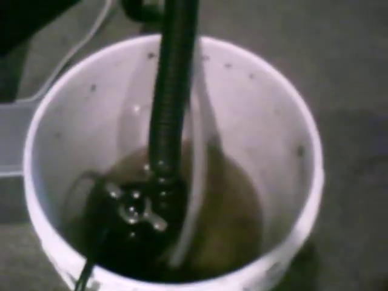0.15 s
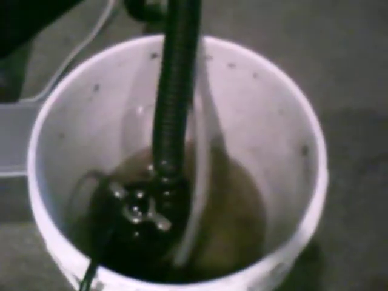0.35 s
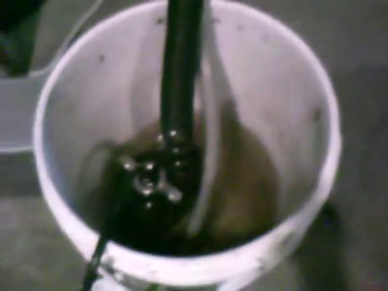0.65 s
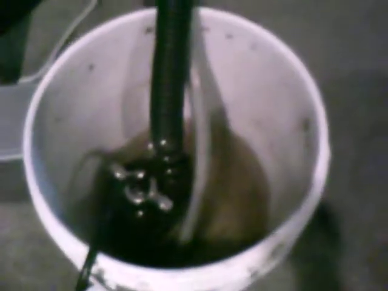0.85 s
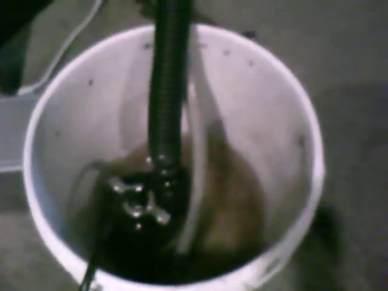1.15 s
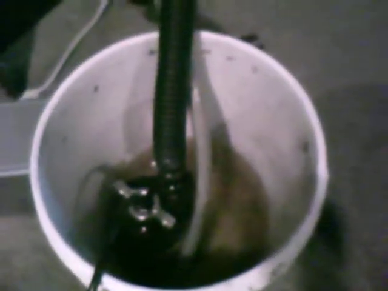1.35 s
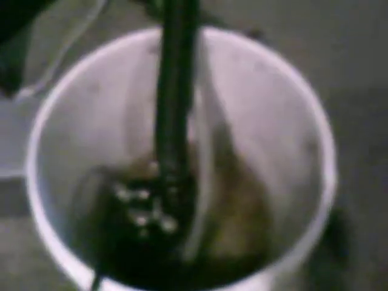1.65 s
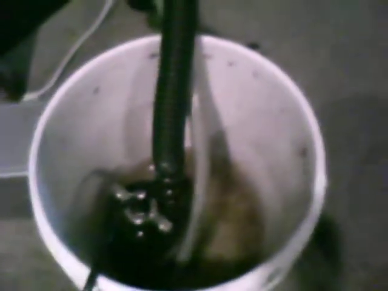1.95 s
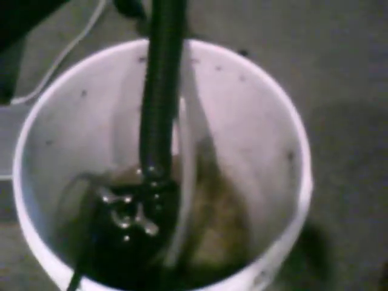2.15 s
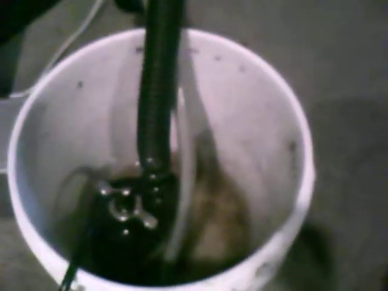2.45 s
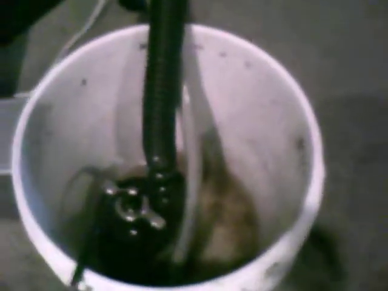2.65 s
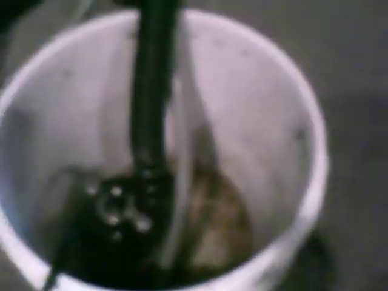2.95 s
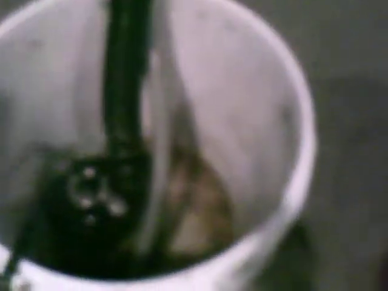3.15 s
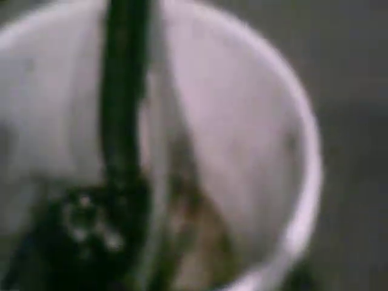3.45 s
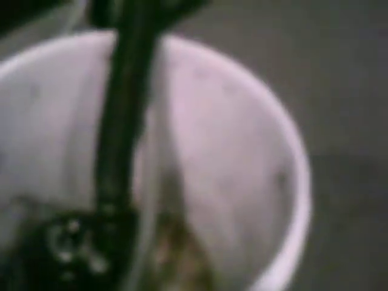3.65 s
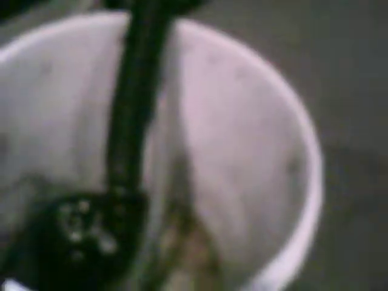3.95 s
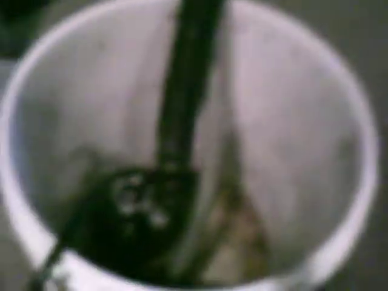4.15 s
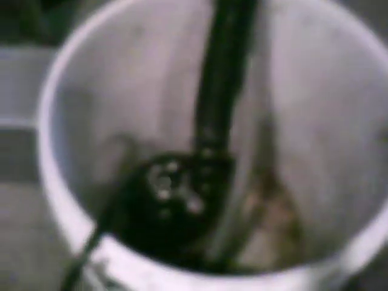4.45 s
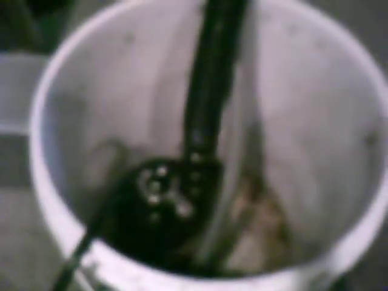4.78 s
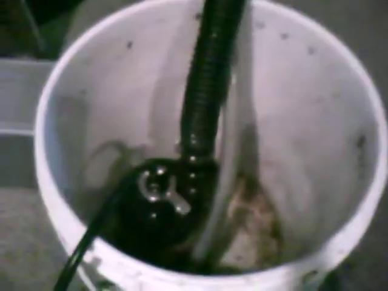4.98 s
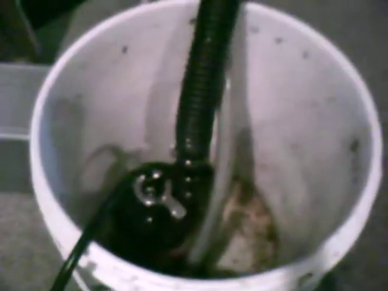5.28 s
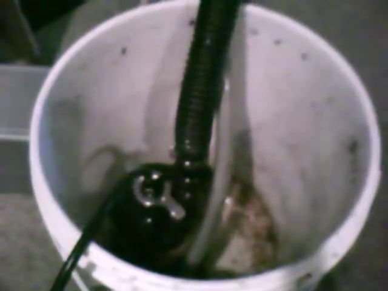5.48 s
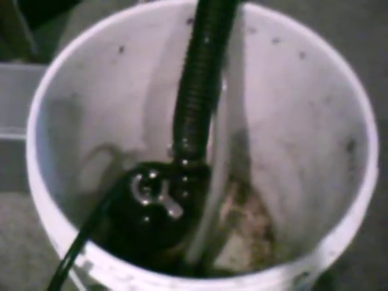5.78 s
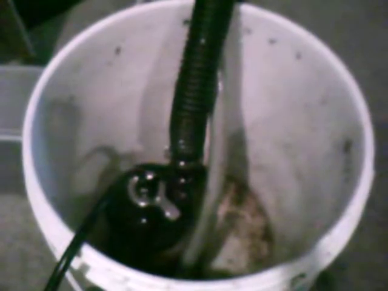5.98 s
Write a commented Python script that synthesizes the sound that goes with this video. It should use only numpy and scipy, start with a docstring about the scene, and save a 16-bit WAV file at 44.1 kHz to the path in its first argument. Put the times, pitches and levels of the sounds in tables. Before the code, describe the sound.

A bucket pump's low electric hum slowly grows beneath a constant room drone and muted rush. Then the intake breaks the surface, spitting and slapping water in rapid irregular bursts, gurgling and ringing in housing and hose. A smooth low moan takes over briefly, the noise calms, and finally raspy air and a brighter buzzing whirr come back. Near microphone, mono, muffled top end.

```python
"""A room where other machinery drones, and a small mains pump empties a bucket.
Steady sines make the drones and filtered noise makes the rush. The pump's hum grows as the water sinks.
Then it gulps air: slugs of water slap in the housing (short bursts of noise), the four vanes sing (sines
that bend in pitch), and air rasps through housing and hose (noise through ringing filters)."""
import sys
import numpy as np
from scipy import signal
from scipy.fft import rfft, irfft, next_fast_len
from scipy.io import wavfile
from scipy.ndimage import uniform_filter1d, map_coordinates

SR = 44100
rng = np.random.default_rng(int(sys.argv[2]) if len(sys.argv) > 2 else 0)


def generate_wav(signal):
    """Clip the signal to [-1, 1] and save it as 16-bit WAV at the path in sys.argv[1]."""
    frames = np.transpose(np.atleast_2d(signal))
    scaled = np.clip(frames, -1, 1) * 32767
    pcm = np.round(scaled).astype(np.int16)
    wavfile.write(sys.argv[1], SR, pcm)


N = 269892
T = np.arange(N) / SR  # time of each sample, s

# In colour and ringing tables, levels only count relative to each other.
# Colour of the steady rush of pump and room: pitch_hz, level_db
RUSH_COLOUR = [(12, -47), (20, -7), (162, -3.5), (219, -6), (288, -4.5), (541, -11.5), (714, -8.5),
               (942, -12), (1210, -15), (1600, -8.5), (2160, -27), (3400, -29.5), (4960, -46),
               (6070, -45.5), (8210, -50), (10700, -93.5), (18100, -120)]
# Broad rises in the rush: pitch_hz, width_hz, lift_db
RUSH_PEAKS = [(228, 20, -1.5), (1159, 47, 8), (1770, 580, 4.5)]
# Tones of a steady motor shaft: multiple of the shaft rate, level_db
SHAFT_TONES = [(.5, -57.5), (1, -54.5), (3, -63), (18, -59), (19, -63), (20, -59.5), (21, -54.5),
               (22, -58.5), (23, -68.5), (24, -59.5), (25, -59.5), (49, -71.5)]
# A second drone, its balance drifting: time_s, first_db, second_db, third_db, sixth_and_eighth_db
DRONE_LEVELS = [(0, -50, -52.5, -76, -58.5), (.8, -47, -48, -66, -55), (1.5, -49, -58.5, -60.5, -65.5),
                (3.2, -44.5, -60.5, -51, -61), (6.12, -53.5, -60, -63.5, -70.5)]
# Faint ticks: start_s, level_db
FAINT_TICKS = [(0.5222, -58), (0.5337, -57), (2.6794, -57), (2.6944, -57), (2.7194, -67)]
# Magnetic hum of the pump; it grows as the water sinks, more once air gets in:
# time_s, first_db, second_db, third_db, fifth_db, sixth_db
HUM_LEVELS = [(0, -54, -60, -54, -76, -64.5), (1.2, -61.5, -48, -56.5, -61, -48),
              (2.3, -55, -44.5, -58, -56.5, -49), (3.2, -52.5, -40.5, -55.5, -49.5, -48.5),
              (3.8, -47.5, -49, -63, -36, -42), (4.3, -42, -47, -61.5, -46.5, -47),
              (4.8, -40, -46, -57, -40, -49.5), (5.5, -42, -46.5, -56.5, -38.5, -44.5),
              (6.12, -42, -51.5, -53.5, -43.5, -50)]
# Vanes passing, slower under load: time_s, pitch_hz, level_db
VANE_TONE = [(3.25, 237, -44), (3.55, 234, -47.5), (3.75, 226.9, -37), (3.9, 225.4, -23.5),
             (4.22, 226.7, -18.5), (4.32, 228.7, -23), (4.42, 231, -32.5), (4.72, 228, -41),
             (4.84, 234, -45), (5.1, 234.5, -45), (5.26, 234.6, -38), (5.58, 234.2, -28),
             (5.82, 233.7, -25.5), (6.07, 232.5, -25.5), (6.12, 233, -34)]
# Third harmonic of the vanes: time_s, level_db
VANE_THIRD = [(3.25, -70.5), (4.3, -49.5), (4.5, -61), (5.35, -47.5), (5.55, -30.5), (5.7, -28.5),
              (6.05, -38), (6.12, -53)]
# Vane harmonics that follow the third: multiple, level_db relative to the third
VANE_OVERTONES = [(4, -11.5), (5, -8.5), (6, -11)]
# The vanes bite a slug of water: middle_s, level_db
VANE_SURGES = [(3.374, -26.5), (3.441, -29.5), (3.54, -30), (3.61, -24.5), (3.689, -24), (3.785, -19.5),
               (3.87, -24.5), (4.521, -31.5), (4.62, -29), (4.69, -36), (4.84, -47)]
# What passes the pump once it gulps: time_s, water_db, air_db, hose_ring_db, housing_ring_db, spray_db
PUMP_FLOW = [(3.27, -36.5, -40, -31, -27, -44), (3.36, -34.5, -37.5, -35.5, -31.5, -44.5),
             (3.55, -35.5, -34.5, -32.5, -38.5, -43.5), (3.8, -32, -35, -33, -38.5, -43),
             (4.1, -34, -36, -35, -41.5, -43.5), (4.29, -39, -39.5, -36.5, -52, -46),
             (4.4, -46, -39.5, -36, -53, -46), (4.5, -42.5, -41, -30, -56, -45.5),
             (4.68, -49, -43, -31.5, -40, -49), (4.78, -58, -48.5, -39.5, -40.5, -52),
             (5.1, -59, -51.5, -47, -40.5, -54), (5.35, -49, -40.5, -42.5, -42.5, -49),
             (5.48, -53.5, -43, -45.5, -38, -47), (5.525, -52.5, -33, -40.5, -28, -43.5),
             (5.77, -53.5, -28, -34, -27.5, -42.5), (5.95, -48.5, -27, -41, -30, -42),
             (6.04, -49, -29, -33, -24.5, -42.5), (6.12, -56, -38, -49, -46, -45)]
# Water sloshing: pitch_hz, width_hz, level_db
GURGLE_RINGS = [(137, 120, -1.5), (250.5, 141, 2.5), (404, 140, 0), (558, 166, -3)]
# Bucket rings, before the filter is applied twice: pitch_hz, width_hz, level_db
BUCKET_RINGS = [(617.7, 27.5, -1), (738, 35.3, 0)]
# Hose rings: pitch_hz, width_hz, level_db
HOSE_RINGS = [(903, 52, 0.5), (951.5, 60, 4), (980, 115, -1)]
# Housing rings, before the filter is applied twice: pitch_hz, width_hz, level_db
HOUSING_RINGS = [(1321, 32, -3), (1401.4, 47, 1)]
# Outlet rings, heard with the water and with the housing ring, before the filter is applied twice:
# pitch_hz, width_hz, level_db
OUTLET_RINGS = [(1153, 82, -0.5), (1197, 93, -3)]
# Air through the intake: pitch_hz, width_hz, level_db
RASP_RINGS = [(1157, 200, -5), (1332, 340, 1.5), (1532, 71, 4.5), (1674, 97, 2.5), (2037, 140, -21.5)]
# Colour of the spray: pitch_hz, level_db
SPRAY_COLOUR = [(1120, -22.5), (1900, 2.5), (2260, -6.5), (2520, -5), (2740, -9.5), (3580, -6.5),
                (3950, -20.5), (4320, -22), (4890, -33), (6200, -52.5), (8060, -83.5), (13600, -120)]
# Rises in the spray: pitch_hz, width_hz, lift_db
SPRAY_RISES = [(2935, 68, 3.5), (3080, 90, 4), (3455, 240, 2), (4270, 390, 8.5)]
# Colour of the hiss: pitch_hz, level_db
HISS_COLOUR = [(4300, -64), (4800, -11.5), (5400, -11.5), (6000, -18.5), (6400, -15.5), (6900, -6),
               (7280, -4), (7700, -10.5), (8300, -17.5)]
# The loudest slugs of water: start_s, spray_db, rasp_db, hiss_db
LOUD_SLAPS = [(3.2892, -23, -23, -53), (3.2992, -34.5, -12.5, -53), (3.321, -17, -27, -52),
              (3.3315, -26.5, -20, -57), (3.3813, -42, -11.5, -60), (3.4213, -18, -19, -51),
              (3.4337, -19.5, -26, -64), (3.4497, -30, -36, -60), (3.4624, -23.5, -26, -63),
              (3.479, -17, -10.5, -60), (3.508, -26, -13.5, -60), (3.533, -27, -28, -59),
              (3.545, -30.5, -28, -54.5), (3.5917, -21, -8.5, -49.5), (3.6231, -24, -24, -68),
              (3.646, -22.5, -16, -67), (3.6897, -22.5, -22, -71), (3.7154, -27.5, -34, -66),
              (3.728, -30, -21, -65.5), (3.7527, -24, -16.5, -61), (3.7759, -24.5, -11, -52),
              (3.8087, -26.5, -23, -65), (3.8463, -26.5, -27, -72), (3.8664, -20.5, -35, -63),
              (3.9044, -36.5, -31, -56), (3.9235, -42.5, -35, -60), (3.949, -35.5, -38, -61),
              (4, -32.5, -29, -65), (4.0308, -31, -34, -66.5), (4.0744, -41, -36, -55),
              (4.118, -44, -38, -50), (4.1904, -38, -42, -62), (4.2404, -40, -29, -60),
              (4.69, -36, -27, -69), (4.902, -50, -26, -57.5), (4.946, -48, -24.5, -62),
              (5.3986, -40, -19.5, -69.5), (5.5994, -39, -16, -75), (5.695, -29.5, -27, -64),
              (5.7514, -29.5, -26, -67), (5.801, -41.5, -18.5, -72), (5.968, -29.5, -19.5, -72),
              (6.01, -28, -27.5, -69)]
# Low jolts of pump and bucket: start_s, pitch_hz, level_db, fade_s (time to fade by 60 dB)
JOLTS = [(3.31, 61, -35, 0.76), (3.596, 260, -19, 0.17), (4.22, 58, -43, .6)]

SHAFT_HZ, DRONE_HZ, WHINE_HZ = 58.63, 212.3, 5906
HUM_HZ = 119.9  # twice the mains
RUSH_DB, WHINE_DB = -41, -82
SURGE_S = 0.019  # from a surge's middle to where it has sunk to about a third
GULP_S = 3.282  # the intake first breaks the surface
BUCKET_WATER_DB, BUCKET_AIR_DB = -3.5, -9.5  # how much of water and of air the bucket passes on
OUTLET_WATER_DB, OUTLET_RING_DB = -7, -3.5  # the outlet, over the water and over the housing ring
HISS_STEADY_DB, HISS_WATER_DB = -75, -40  # a steady part, and a part over the water level
SMALL_COUNT = 60  # small slugs at random moments
SMALL_DB = (2, 6.5, -27)  # their spray, rasp and hiss over the water level, before scatter
SMALL_SCATTER_DB = 4.5  # times the log of a random number from 0 to 1
RASP_FADE_S, SPRAY_FADE_S, HISS_FADE_S = 0.037, 0.032, 0.077  # time to fade by 60 dB
TOP_HZ = 8300


def amp(db):
    """Turn decibels into a plain gain."""
    return 10 ** (np.asarray(db) / 20)


def unit(x):
    """Scale to an rms of 1."""
    return x / np.sqrt(np.mean(x ** 2) + 1e-20)


def both(*db):
    """Gain of unrelated sounds together: their powers add."""
    return np.sqrt(sum(amp(2 * d) for d in db))


def curves(rows):
    """One value per sample for each column after the time."""
    s, *columns = np.transpose(rows)
    return [np.interp(T, s, column) for column in columns]


def wobble(rate):
    """A smooth random curve through a given number of random points a second."""
    points = rng.standard_normal(int(N * rate / SR) + 4)
    return map_coordinates(points, [T * rate])


def filtered(x, response):
    """Pass x through a filter, given as a gain for each frequency."""
    size = next_fast_len(N + 8192)
    spectrum = rfft(x, size) * response(np.fft.rfftfreq(size, 1 / SR))
    return irfft(spectrum, size)[:N]


def shape(points, peaks=()):
    """A filter drawn through points on a log pitch axis, lifted at the peaks."""
    f, level_db = np.transpose(points)

    def response(hz):
        base_db = np.interp(np.log(hz + 1), np.log(f + 1), level_db)
        lift_db = sum(db / (1 + (2 * (hz - c) / w) ** 2) for c, w, db in peaks)
        return amp(base_db + lift_db)
    return response


def modes(table, edge_hz=2300):
    """A filter that rings at several pitches; the ringing is dull: little of it sounds above the edge."""
    def response(f):
        ring = 0
        for k, (c, w, db) in enumerate(table):
            sign = (-1) ** k  # neighbours alternate
            ring = ring + sign * amp(db) * 1j * f * w / (c * c - f * f + 1j * f * w)
        return ring / (1 + (f / edge_hz) ** 5)
    return response


def twice(table):
    """The ringing filter applied twice: sharp rings, dark between."""
    once = modes(table)
    return lambda f: once(f) ** 2


def noise(response, gain=1, patchy_db=0):
    """Noise with short patches of random colour, under a gain, then filtered; rms 1 where the gain is 1."""
    z = signal.stft(rng.standard_normal(N), nperseg=256)[2]
    patches = uniform_filter1d(rng.standard_normal(z.shape), 4, 0)  # smooth over pitch
    patches = uniform_filter1d(patches, 6, 1)  # smooth over time
    source = signal.istft(z * amp(patchy_db * unit(patches)), nperseg=256)[1][:N]
    return filtered(source * gain, response) / np.std(filtered(source, response))


def tone(phase, db):
    """A sine of given rms level, phase in turns, from a random starting point."""
    return np.sqrt(2) * amp(db) * np.sin(2 * np.pi * (phase + rng.random()))


def bursts(times, db, fade_s, rise=0.0029):
    """A gain that swells quickly at each time and dies away; rise in seconds."""
    hits = np.zeros(N)
    hits[np.round(np.asarray(times) * SR).astype(int)] = amp(db)
    t = T[:SR // 2]
    swell = amp(-60 * t / fade_s) * (1 - np.exp(-t / rise))
    return signal.fftconvolve(hits, swell)[:N]


def machinery():
    """The rush throbs at the shaft rate and twice it; shaft tones, a drone, ticks and a thin whine lie on top."""
    throb = 1 + 0.15 * np.sin(2 * np.pi * SHAFT_HZ * T) + 0.14 * np.sin(4 * np.pi * SHAFT_HZ * T + 1)
    out = amp(RUSH_DB + 0.37 * wobble(3.8)) * noise(shape(RUSH_COLOUR, RUSH_PEAKS), throb)
    for k, db in SHAFT_TONES:
        out += tone(k * SHAFT_HZ * T, db + 1.0 * wobble(2.9))
    first, second, third, high = curves(DRONE_LEVELS)
    for k, db in [(1, first), (2, second), (3, third), (6, high), (8, high)]:
        out += tone(k * DRONE_HZ * T, db + 0.47 * wobble(8.8))
    s, db = np.transpose(FAINT_TICKS)
    tick_colour = shape([(2500, -30), (3900, 1), (5400, -7), (6200, -12), (8000, -14)])
    ticks = noise(tick_colour, bursts(s, db, fade_s=0.08, rise=0.004))
    whine = tone(WHINE_HZ * T + 0.25 * wobble(15), WHINE_DB)
    return out + ticks + whine


def motor():
    """Magnetic hum: multiples of twice the mains, slightly unsteady in level."""
    levels = zip([1, 2, 3, 5, 6], curves(HUM_LEVELS))
    return sum(tone(k * HUM_HZ * T, db + (0.8 + 0.3 * k) * wobble(9)) for k, db in levels)


def vanes():
    """Each vane pushes once as it passes the outlet; slugs of water make the tone surge."""
    hz, db = curves(VANE_TONE)
    strength = amp(db)
    for s, surge_db in VANE_SURGES:
        strength += amp(surge_db) * np.exp(-((T - s) / SURGE_S) ** 2)
    third_db = curves(VANE_THIRD)[0]
    fade_in = np.clip((T - VANE_TONE[0][0]) / 0.033, 0, 1)
    turns = np.cumsum(hz + 2.48 * wobble(30)) / SR  # cycles of the tone so far
    out = strength * (tone(turns, 0.5 * wobble(25)) + tone(2 * turns, -27.5))
    out += tone(3 * turns, third_db + 1.3 * wobble(30))
    for k, relative_db in VANE_OVERTONES:
        out += tone(k * turns, third_db + relative_db + 2.0 * wobble(37))
    return fade_in * out


def slurp():
    """Air and water alternate in the intake: one shared churning stirs noise through every ringing part."""
    water_db, air_db, hose_db, housing_db, spray_db = curves(PUMP_FLOW)
    fade_in = np.clip((T - GULP_S) / 0.0076, 0, 1)
    churn = 1.3 * wobble(28) + 1.2 * wobble(70)
    bucket = both(water_db + BUCKET_WATER_DB, air_db + BUCKET_AIR_DB)
    outlet = both(water_db + OUTLET_WATER_DB, housing_db + OUTLET_RING_DB)
    hiss = both(HISS_STEADY_DB, water_db + HISS_WATER_DB)
    out = noise(modes(GURGLE_RINGS), amp(water_db + 3.5 + 0.42 * churn + 1.9 * wobble(14)))
    out += noise(twice(BUCKET_RINGS), bucket * amp(3.0 + 0.35 * churn + 1.9 * wobble(13)))
    out += noise(modes(HOSE_RINGS), amp(hose_db + 0.38 * churn + 0.37 * wobble(25)))
    out += noise(twice(HOUSING_RINGS), amp(housing_db + 0.37 * churn + 1.1 * wobble(12)))
    out += noise(twice(OUTLET_RINGS), outlet * amp(1.1 * churn + 1.2 * wobble(11)))
    out += noise(modes(RASP_RINGS), amp(air_db + 2.0 + 1.0 * churn))
    out += noise(shape(SPRAY_COLOUR, SPRAY_RISES), amp(spray_db + 0.67 * churn))
    out += noise(shape(HISS_COLOUR), hiss * amp(0.6 * churn))
    return fade_in * out


def slaps():
    """Each slug knocks the intake and spits spray of its own colour; small random ones follow the water level."""
    when, *chance = rng.random((SMALL_COUNT, 4)).T
    small_s = GULP_S + when * (T[-1] - GULP_S)
    water_db = curves(PUMP_FLOW)[0][(small_s * SR).astype(int)]
    small = [small_s]
    for db, c in zip(SMALL_DB, chance):
        small.append(water_db + db + SMALL_SCATTER_DB * np.log(c + 1e-3))
    s, spray_db, rasp_db, hiss_db = np.hstack([np.transpose(LOUD_SLAPS), small])
    rasp = noise(modes(RASP_RINGS), bursts(s, rasp_db, RASP_FADE_S, rise=0.0025), patchy_db=1)
    spray_gain = bursts(s, spray_db, SPRAY_FADE_S, rise=0.0023)
    spray = noise(shape(SPRAY_COLOUR, SPRAY_RISES), spray_gain, patchy_db=2.5)
    hiss = noise(shape(HISS_COLOUR), bursts(s, hiss_db, HISS_FADE_S), patchy_db=5.5)
    return rasp + spray + hiss


def thuds():
    """Each jolt of pump and bucket rings as a soft, low sine that dies away."""
    return sum(bursts([s], db, fade_s) * np.sin(2 * np.pi * hz * (T - s)) for s, hz, db, fade_s in JOLTS)


def scene():
    """All sources added together, as one channel."""
    return (machinery() + motor() + vanes() + slurp() + slaps() + thuds())[None]


def record(dry):
    """The treble rolls off towards a sharp top limit; a trace of hiss lies over everything."""
    def edge(hz):
        return (hz < TOP_HZ) * amp(-20 * np.clip((hz - 7450) / 700, 0, 2) ** 2)
    return filtered(dry[0], edge)[None] + amp(-99.5) * rng.standard_normal(dry.shape)


dry = scene()
out = record(dry)
generate_wav(out)
```